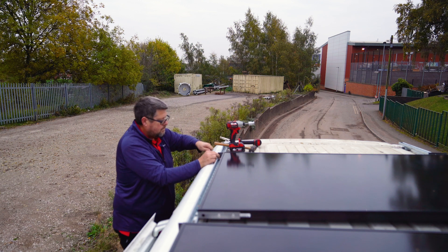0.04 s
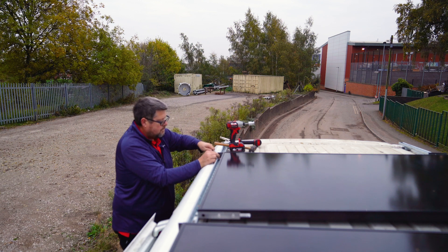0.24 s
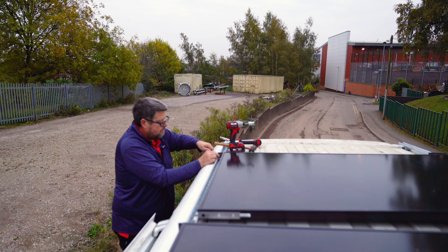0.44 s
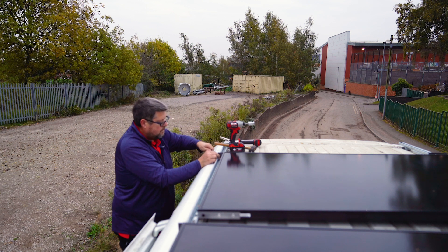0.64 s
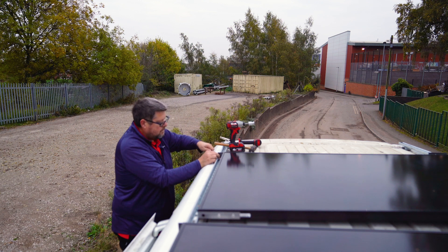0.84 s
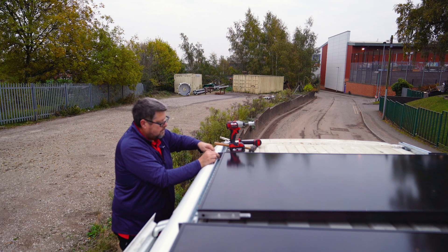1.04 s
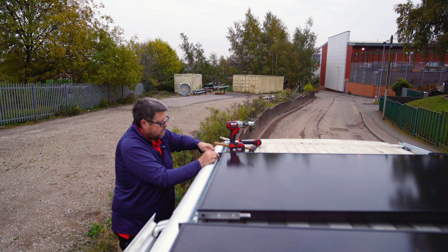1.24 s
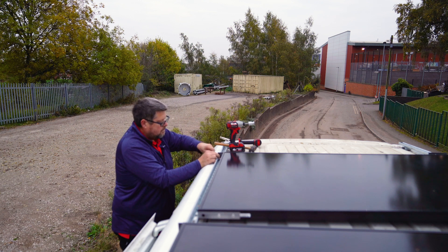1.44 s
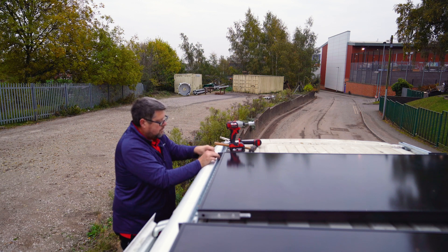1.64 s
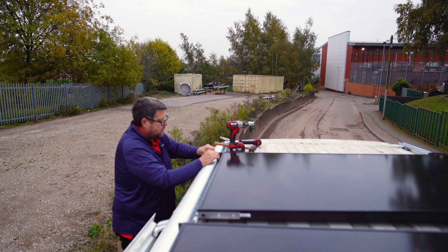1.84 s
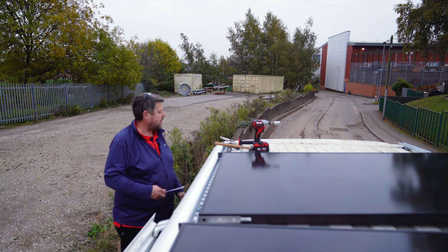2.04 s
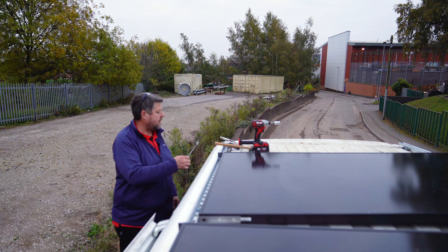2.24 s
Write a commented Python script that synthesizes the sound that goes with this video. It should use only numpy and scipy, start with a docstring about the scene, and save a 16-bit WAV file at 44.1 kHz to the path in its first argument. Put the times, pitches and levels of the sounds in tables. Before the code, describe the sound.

A metal clamp on a van roof clicks lightly, then snaps hard twice at about 0.2 and 0.3 seconds, leaving a thin steel ring and a soft falling twang. Lighter irregular clicks continue until about 1.1 seconds, strongest near 0.5, 0.7 and 0.9. Faint distant traffic and low puffs of wind run throughout the quiet yard, with barely audible steel clinks near 1.8 and 2.2 seconds.

```python
"""Light clicks, two hard snaps, then more clicks: a metal clamp worked by hand on the edge of a van roof.
Each click rings the part struck (screw, jaw, bar or roof rail) and, briefly, the roof's dense modes.
Snaps leave a thin steel shimmer and a falling twang of bending waves in the panel.
A loose steel part clinks faintly. Light wind and far traffic lie behind, in a quiet yard."""
import sys
import numpy as np
from scipy import signal
from scipy.fft import irfft
from scipy.io import wavfile
from scipy.ndimage import uniform_filter1d

SR = 44100
rng = np.random.default_rng(int(sys.argv[2]) if len(sys.argv) > 2 else 0)


def output_pcm(signal):
    """Save a mono or channel-first signal as 16-bit PCM at the path in sys.argv[1].

    Samples are clipped to [-1, 1] before scaling.
    """
    pcm = np.clip(np.atleast_2d(signal).T, -1, 1) * 32767
    wavfile.write(sys.argv[1], SR, np.round(pcm).astype(np.int16))


N = 101429

# traffic spectrum: freq_hz, gain_db
TRAFFIC_COLOUR = [(40, -20.5), (70, 0.5), (210, -2.5), (600, -7.5), (930, -6.5), (1620, -11), (2000, -15.5),
                  (4400, -31.5), (11500, -41.5), (15000, -59)]
# traffic swell: time_s, gain_db
TRAFFIC_SWELL = [(0, 2.5), (1.3, 0.5), (2.0, 1), (2.12, -2), (2.3, -0.5)]
# wind spectrum: freq_hz, gain_db
WIND_COLOUR = [(15, -20.5), (26, -14.5), (34, 10.5), (46, -12), (65, -27.5), (150, -58), (1000, -100)]
# wind puffs: time_s, level_db
WIND_PUFFS = [(0.0, -61), (0.1, -66), (0.21, -50.5), (0.3, -65), (0.43, -53), (0.54, -62.5), (1.1, -62.5),
              (1.86, -68.5), (1.93, -52), (2.05, -61), (2.1, -79.5)]
# loose steel: start_s, gain_db, ring_hz, t60_s, spread_ratio, scrape_db
CLINKS = [(0.35, -47, 2680, 0.071, 0.017, -5.5), (1.822, -71, 7400, 0.019, .1, 0),
          (2.218, -69.5, 4390, 0.21, 0.078, -3.5)]
# panel twangs: start_s, gain_db, pitch_hz, t60_s, pitch_halving_s
TWANGS = [(0.026, -53, 384, 0.097, 0.14), (0.233, -43, 900, 0.31, .10), (0.292, -48, 347, 0.17, 0.065),
          (0.496, -54.5, 503, 0.075, 0.33), (0.92, -51.5, 343, 0.15, 0.45)]
# dips near 1.9 and 10 kHz in every click's clatter and shimmer: centre_hz, half_width_hz, gain_db
CLICK_NOTCHES = [(1940, 120, -2), (10280, 330, -5.5)]
# steel shimmer, relative to the click: freq_hz, gain_db
SHIMMER = [(300, -21), (900, -37), (2800, -29), (4200, -26), (5500, -19.5), (6800, -24.5), (9500, -26),
           (14000, -47.5)]
# modes of each part: freq_hz, gain_db
SCREW = [(1090, -5), (2505, 2), (3005, -0.5), (5480, 4), (6400, 0.5), (8300, 2.5), (8850, 1), (9260, -2),
         (11270, -1.5), (12020, -9.5)]
JAW = [(755, 2), (1040, -2), (1120, -2.5), (2044, 0), (2490, -3), (3740, -6.5), (3966, -4.5), (5240, -5),
       (5484, -7), (6365, -2.5), (6999, -8.5), (8829, -3.5)]
BAR = [(640, -5.5), (734, 1.5), (934, -2), (1415, 3), (3284, 4), (3369, 6), (4349, -6.5), (6357, -4.5),
       (7750, -5)]
RAIL = [(415, 6), (717, 5), (827, -2), (2190, -0.5), (2330, 4), (2574, -4), (3744, -6.5), (4349, -3),
        (4990, -1.5)]
# long clamp modes, in every click: freq_hz, gain_db, t60_s
LONG_MODES = [(1595, -19, .6), (8080, -26.5, .62)]
# by part name: modes, ring_t60_s, clatter_t60_s, clatter_db
PARTS = {"screw": (SCREW, 0.073, 0.095, -4.5), "jaw": (JAW, 0.095, 0.093, -4),
         "bar": (BAR, .12, 0.094, -4.5), "rail": (RAIL, 0.1, 0.093, -2)}
# click bands: centre_hz
BANDS_HZ = [450, 900, 1700, 3000, 4400, 7000, 12000]
# clamp clicks: start_s, part, then level_db per band
CLICKS = [(-.002, "screw", -47, -52.5, -56, -42.5, -52, -46, -54.5),
          (0.025, "screw", -41, -44, -43, -35.5, -49, -49.5, -60.5),
          (0.218, "bar", -30.5, -27, -32.5, -27.5, -29, -23, -38),
          (0.2876, "jaw", -27, -26, -24.5, -19.5, -19.5, -13.5, -23),
          (0.41, "screw", -54.5, -46, -47.5, -43, -53, -48, -89),
          (0.447, "screw", -49.5, -45, -45, -41, -47, -52, -84),
          (0.458, "screw", -51, -48.5, -45, -42, -46.5, -50, -72),
          (0.4891, "screw", -42, -37, -41.5, -26, -36.5, -31, -45),
          (0.533, "screw", -49, -45.5, -46, -44.5, -39.5, -40, -50),
          (.605, "screw", -51, -54, -73, -49.5, -53.5, -55.5, -78),
          (0.651, "screw", -55, -55.5, -56.5, -40.5, -47.5, -50, -63),
          (0.679, "screw", -56, -67.5, -56.5, -44, -52, -49, -64),
          (0.7309, "rail", -40.5, -35, -37, -32, -29.5, -43.5, -55),
          (0.898, "screw", -60, -56, -61, -50.5, -58, -61, -71.5),
          (0.9193, "screw", -42, -36.5, -38.5, -27.5, -31.5, -26.5, -40),
          (0.9977, "screw", -51.5, -55, -50, -36, -47, -45, -57.5),
          (1.1215, "bar", -41.5, -47.5, -55, -49.5, -55, -55, -71),
          (1.1266, "screw", -42.5, -50.5, -57.5, -43, -46, -45.5, -59.5)]

TRAFFIC_DB, RING_DB = -65.5, -6.5
ATTACK_S, HOLD_S = 0.004, 0.0022
COUPLING_HALF_WIDTH_HZ, COUPLING_DB = 45.36, 3
BASS_CUT_HZ, SPLIT_HZ, TREBLE_CUT_HZ = 323, 810, 13330
TREBLE_LOSS_HZ_PER_DB, SHIMMER_LOSS_DB_PER_DB = 50, 0.14  # softer clicks are duller


def amp(db):
    """Decibels to gain."""
    return 10 ** (np.asarray(db) / 20)


def unit(x):
    """Scale to rms 1."""
    return x / np.sqrt(np.mean(x ** 2))


def slope(hz, points):
    """Interpolate (freq_hz, gain_db) points over log frequency."""
    p = np.array(points)
    return np.interp(np.log(hz + 1e-9), np.log(p[:, 0]), p[:, 1])


def noise(gain):
    """Noise of the given spectrum, rms 1."""
    return unit(irfft(gain * np.exp(2j * np.pi * rng.random(len(gain)))))


def scaled_noise(gain):
    """Noise with the spectrum's total power."""
    return noise(gain) * np.linalg.norm(gain)


def envelope(t, t60_s, attack_s, hold_s):
    """Linear rise, hold, exponential decay."""
    decay = np.exp(-np.log(1000) * np.maximum(t - attack_s - hold_s, 0) / t60_s)
    return np.clip(t / attack_s, 0, 1) * decay


def add(out, start_s, x):
    """Mix x in at start_s."""
    i = int(round(start_s * SR))
    x, i = x[max(-i, 0):], max(i, 0)
    out[i:i + len(x)] += x[:N - i]


def axes():
    """Time and frequency axes for 1 s."""
    return np.arange(SR) / SR, np.arange(SR // 2 + 1) + 1e-3


def traffic(t, hz):
    """Far traffic: a soft, nearly steady wash."""
    wash = noise(amp(slope(hz, TRAFFIC_COLOUR)))[:N]
    return wash * amp(TRAFFIC_DB + np.interp(t, *np.array(TRAFFIC_SWELL).T))


def wind(t, hz):
    """Light wind: low rumble in puffs."""
    rumble = noise(amp(slope(hz, WIND_COLOUR)))[:N]
    steady = rumble / np.sqrt(uniform_filter1d(rumble ** 2, size=4000))
    return steady * amp(np.interp(t, *np.array(WIND_PUFFS).T))


def clink(ring_hz, t60_s, spread_ratio, scrape_db):
    """Loose steel touches lightly: close modes plus scrape."""
    t, hz = axes()
    ring = noise(1 / (1 + ((hz / ring_hz - 1) / spread_ratio) ** 2))
    scrape = noise(amp(slope(hz, [(1000, -8), (5000, -3), (9000, -8.5), (14000, -21)])))
    return (ring + amp(scrape_db) * scrape) * envelope(t, t60_s, attack_s=0.0032, hold_s=t60_s / 10)


def twang(pitch_hz, t60_s, halving_s):
    """Panel bending waves: lower ones arrive later, so pitch falls. Fast falls are broader."""
    t, _ = axes()
    cycles = np.cumsum(pitch_hz / (1 + t / halving_s)) / SR
    ratios = 1 + 0.025 / halving_s * (np.linspace(-1, 1, 5) + 0.098 * rng.standard_normal(5))
    waves = sum(np.sin(2 * np.pi * (cycles * ratio + rng.random())) for ratio in ratios)
    shape = envelope(t, t60_s, attack_s=0.037, hold_s=0.013)
    return unit(waves * shape) * np.sqrt(np.mean(shape ** 2))


def roof_response(hz, modes):
    """The roof is driven hardest near the struck part's modes."""
    peaks = sum(1 / (1 + ((hz - mode_hz) / COUPLING_HALF_WIDTH_HZ) ** 2) for mode_hz, _ in modes)
    gain = np.sqrt(1 + amp(COUPLING_DB) ** 2 * peaks)
    return gain / np.sqrt(uniform_filter1d(gain ** 2, size=1500))


def roof_clatter(t, hz, colour, high_t60_s):
    """Dense rail and panel modes as grainy noise; lows last longer."""
    low_share = 1 / (1 + (hz / SPLIT_HZ) ** 2)
    low = scaled_noise(colour * np.sqrt(low_share))
    low *= envelope(t, t60_s=0.13, attack_s=0.0031, hold_s=HOLD_S)
    high = scaled_noise(colour * np.sqrt(1 - low_share))
    high *= envelope(t, high_t60_s, ATTACK_S, HOLD_S)
    grain = unit(np.exp(0.165 * noise(1 / (1 + (hz / 300) ** 2))))
    return (low + high) * grain


def part_ring(t, bands_db, modes, ring_t60_s):
    """The struck part's modes and the clamp's long ones; level and pitch scatter per strike."""
    spectrum = list(zip(BANDS_HZ, bands_db))
    ring = np.zeros_like(t)
    for mode_hz, gain_db, t60_s in [(*mode, ring_t60_s) for mode in modes] + LONG_MODES:
        strike_db = gain_db + slope(mode_hz, spectrum) + 1.5 * rng.standard_normal()
        pitch_hz = mode_hz * (1 + 0.002 * rng.standard_normal())
        tone = np.sin(2 * np.pi * (pitch_hz * t + rng.random()))
        ring += amp(strike_db) * envelope(t, t60_s, ATTACK_S, hold_s=0) * tone
    return ring


def click(bands_db, modes, ring_t60_s, clatter_t60_s, clatter_db):
    """One clamp contact: the roof clatters, the part rings, the steel shimmers on."""
    t, hz = axes()
    softer_db = max(row[-1] for row in CLICKS) - bands_db[-1]  # top band, below the hardest snap
    top_hz = TREBLE_CUT_HZ - TREBLE_LOSS_HZ_PER_DB * softer_db
    density_db = bands_db - 10 * np.log10(np.gradient(BANDS_HZ))
    notch_db = sum(db * np.exp(-((hz - at_hz) / width_hz) ** 2) for at_hz, width_hz, db in CLICK_NOTCHES)
    colour = roof_response(hz, modes) * amp(slope(hz, list(zip(BANDS_HZ, density_db))) + notch_db)
    colour /= np.sqrt(1 + (BASS_CUT_HZ / hz) ** 12)
    colour /= np.sqrt(1 + (hz / top_hz) ** 24)
    clatter = roof_clatter(t, hz, colour, clatter_t60_s)
    ring = part_ring(t, bands_db, modes, ring_t60_s)
    shimmer = scaled_noise(colour * amp(slope(hz, SHIMMER) - SHIMMER_LOSS_DB_PER_DB * softer_db))
    shimmer *= envelope(t, t60_s=0.42, attack_s=0.018, hold_s=0)
    return amp(clatter_db) * clatter + amp(RING_DB) * ring + shimmer


def scene():
    """Yard, clamp and panel, mono."""
    t, hz = np.arange(N) / SR, np.arange(N + 1) * SR / (2 * N)
    out = traffic(t, hz) + wind(t, hz)
    for start_s, part, *bands_db in CLICKS:
        add(out, start_s, click(np.array(bands_db), *PARTS[part]))
    for start_s, gain_db, *shape in TWANGS:
        add(out, start_s, amp(gain_db) * twang(*shape))
    for start_s, gain_db, *shape in CLINKS:
        add(out, start_s, amp(gain_db) * clink(*shape))
    return out[None]


def record(dry):
    """Steep low-pass at 16 kHz."""
    return signal.sosfilt(signal.ellip(8, .2, 70, 16000, fs=SR, output="sos"), dry)


dry = scene()
out = record(dry)
output_pcm(out)
```